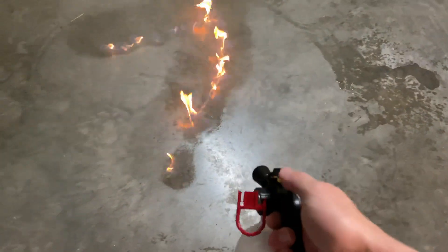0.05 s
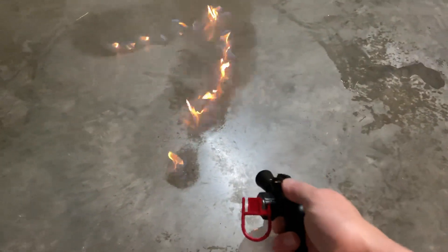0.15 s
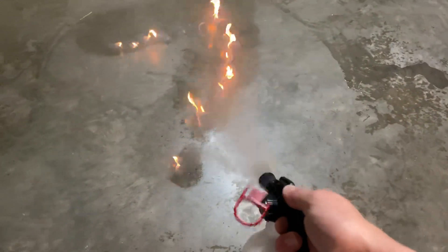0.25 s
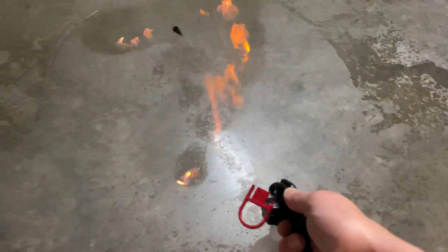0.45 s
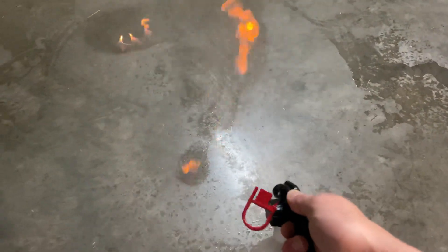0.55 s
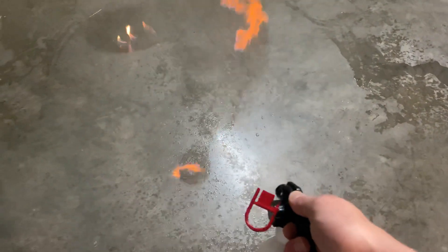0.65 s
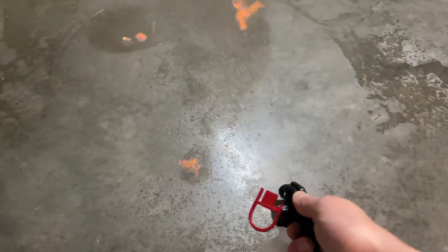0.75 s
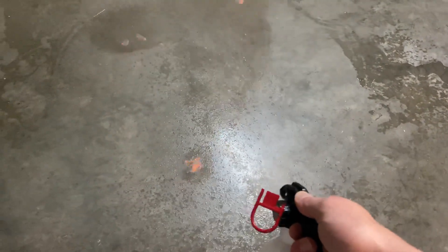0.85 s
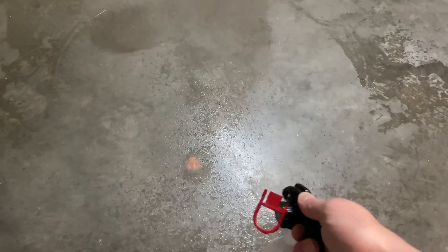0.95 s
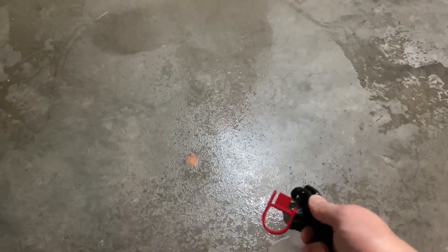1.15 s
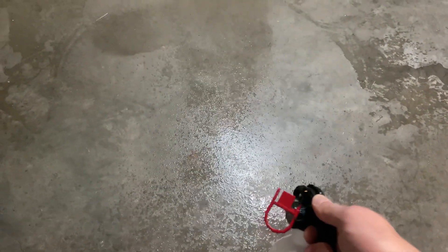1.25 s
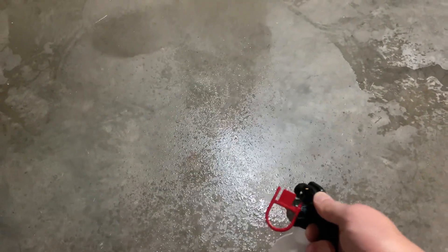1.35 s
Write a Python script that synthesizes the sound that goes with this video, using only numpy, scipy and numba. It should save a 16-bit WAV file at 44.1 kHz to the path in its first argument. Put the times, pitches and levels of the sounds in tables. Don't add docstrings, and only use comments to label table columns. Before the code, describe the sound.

A handheld water extinguisher spray: near silence, a thin leak, then a sharp bursting hiss close to the microphone, quickly sagging to duller wet sputter, with a dull knock midway, in an echoing concrete room.

```python
import sys
import numpy as np
from scipy import signal
from scipy.fft import rfft, irfft
from scipy.io import wavfile
from scipy.ndimage import uniform_filter1d
from numba import njit

SR = 44100
rng = np.random.default_rng(int(sys.argv[2]) if len(sys.argv) > 2 else 0)


def ratio(d):
    e = np.asarray(d, float) / 20
    return 10 ** e


def master(y):
    cut = np.clip(np.atleast_2d(y).T, -1, 1)
    pcm = np.round(cut * 32767)
    wavfile.write(sys.argv[1], SR, pcm.astype(np.int16))


N = 61739
T = np.arange(N) / SR
OPEN_S = 0.246
FLICKER_DB = 1.2


def level(x, rms_db):
    return x * ratio(rms_db) / np.sqrt(np.mean(x ** 2))


def noise():
    return rng.standard_normal(N)


def colour(x, points):
    points_hz, points_db = np.array(points, float).T
    bins_hz = np.maximum(np.arange(N // 2 + 1) * SR / N, 1)
    gain_db = np.interp(np.log(bins_hz), np.log(points_hz), points_db)
    return level(irfft(rfft(x) * ratio(gain_db), N), 0)


@njit
def svf(x, hz, width_hz):
    y = np.empty(len(x))
    band, low = 0., 0.
    for i in range(len(x)):
        g = np.tan(np.pi * hz[i] / SR)
        k = width_hz / hz[i]
        v = (band + g * (x[i] - low)) / (1 + g * (g + k))
        band = 2 * v - band
        low += 2 * g * v
        y[i] = k * v
    return y


def walk(rate_hz):
    hold = int(SR / rate_hz)
    steps = np.clip(rng.standard_normal(N // 8)[:N // hold + 1], -1.7, 1.7)
    slewed = uniform_filter1d(np.repeat(steps, hold), hold)
    return 1.3 * uniform_filter1d(slewed, hold)[:N]


def rings(table, drift):
    out = 0
    for hz, width_hz, level_db in table:
        centre_hz = hz * (1 + drift * walk(13.2))
        flicker = ratio(level_db + FLICKER_DB * walk(24.2))
        once = svf(noise(), centre_hz, float(width_hz))
        out = out + flicker * level(svf(once, centre_hz, float(width_hz)), 0)
    return out


def decay(start_s, t60_s):
    return np.exp(-np.log(1000) * np.maximum(T - start_s, 0) / t60_s)


def fade(start_s, t60_s):
    return (T >= start_s) * decay(start_s, t60_s)


def rise(start_s, length_s):
    return np.clip((T - start_s) / length_s, 0, 1)


def pings(table):
    out = 0
    for centre_s, level_db, pitch_hz, half_ms in table:
        t = T - centre_s
        out = out + ratio(level_db) * np.exp(-(t * 1000 / half_ms) ** 2) * np.sin(2 * np.pi * pitch_hz * t)
    return out


# hz [Hz], level_db [dB per Hz]
ROOM_TONE = [(30, -12), (60, 3.5), (130, -13.5), (250, -7.5), (500, -10), (1900, -22.5), (4000, -29),
             (16000, -44)]
# time_s [s], level_db [dB]
AIR_GUSTS = [(0, -49), (.17, -48), (.2, -54), (.5, -52), (.62, -47), (.95, -50), (1.1, -40), (1.22, -46),
             (1.3, -41), (1.4, -48)]
# start_s [s], level_db [dB], length_s [s]
AIR_SHOVES = [
    (0.2474, -25, 0.0099),
    (.278, -38, 0.024),
]


def air():
    gust_s, gust_db = np.array(AIR_GUSTS).T
    slow = colour(noise(), [(1, -37), (5, 1), (15, -1), (35, -12), (70, -31), (200, -59)])
    slow = slow * ratio(np.interp(T, gust_s, gust_db))
    push = colour(noise(), [(20, -6), (70, -4), (300, -4), (900, -14)])
    push = ratio(-29.5) * fade(OPEN_S - .002, 0.11) * push
    shove = 0
    for start_s, level_db, length_s in AIR_SHOVES:
        swing = np.cos(np.pi * (T - start_s) / length_s)
        shove = shove + ratio(level_db) * rise(start_s, 0.0011) * fade(start_s, 4 * length_s) * swing
    room_db = -62 + 10 * (T > OPEN_S)
    return ratio(room_db) * colour(noise(), ROOM_TONE) + slow + push + shove


# hz [Hz], width_hz [Hz], level_db [dB]
VALVE_GAP = [(4300, 900, -3), (5000, 900, -2), (7700, 1300, -10), (10300, 2500, -13), (14500, 3000, -21),
             (1900, 1500, -20), (9000, 8000, -14)]


def leak():
    swell = rise(.199, .013) ** 2 * (T < OPEN_S)
    return ratio(-39) * swell * rings(VALVE_GAP, 0.011)


# centre_s [s], level_db [dB], pitch_hz [Hz],
# half_ms [ms]
SINGLE_PINGS = [(.2468, -5, 5600, .6), (.2481, -9, 7900, .7), (.249, -24, 300, 2.5), (.289, -17, 1950, 2.5),
                (.5138, -16, 10800, .1), (.5146, -22, 9800, .8), (.509, -23, 10500, .4),
                (1.127, -25, 4200, 1.), (1.140, -26, 4600, 1.8), (1.138, -32, 2000, 1.4),
                (1.356, -31, 1750, .9), (1.021, -39, 420, 2.5), (.203, -56, 1000, 4)]


def single_pings():
    return pings(SINGLE_PINGS)


# time_s [s], level_db [dB], throat_hz [Hz], mist_db [dB]
NOZZLE_FLOW = [(0.2431, -40, 5470, -18), (0.2462, -13.5, 5300, -8), (0.253, -11.5, 5300, 2.5),
               (0.272, -7, 5430, -7), (0.329, -13.5, 4970, -14), (.4, -19.5, 4900, -14),
               (.49, -25, 5130, -31), (.54, -24, 4970, -2.5), (0.702, -26, 4700, -30),
               (.92, -27, 4700, -23), (1.14, -31, 4350, -13), (1.25, -35, 4000, -6.5),
               (1.4, -40.5, 4600, -4)]
# hz [Hz], level_db [dB per Hz]
GAS_JET = [(35, -56), (60, -29.5), (398, -16.5), (1440, -20), (1950, -28), (2710, -19), (5460, -13),
           (12100, -11), (16000, -22)]
# hz [Hz], width_hz [Hz], level_db [dB]
GAS_WHISTLES = [(6066, 31, -6), (8560, 100, -12), (5430, 500, -6), (4120, 210, -5.5), (8030, 520, -12)]
# hz [Hz], level_db [dB per Hz]
WATER_SPRAY = [(35, -46), (60, -19.5), (346, -5.5), (389, -3.5), (666, -8), (2000, -4), (4860, -2.5),
               (11500, -14), (16000, -23)]
# hz [Hz], width_hz [Hz], level_db [dB]
NOZZLE_PIPES = [(2030, 420, -6), (2350, 700, -10), (3400, 900, -8), (520, 600, -19), (6300, 1200, -10)]
# hz [Hz], level_db [dB per Hz]
MIST_HISS = [(5000, -39), (8000, -3), (10000, 9.5), (12500, 2.5), (14500, -13), (16000, -14)]


def nozzle():
    time_s, level_db, throat_hz, mist_db = np.array(NOZZLE_FLOW).T
    gas = decay(OPEN_S + 0.051, 1)

    hz = np.interp(T, time_s, throat_hz) * (1 + 0.039 * walk(30.3))
    throat = svf(svf(noise(), hz, 2960.0), hz, 2940.0)
    throat = level(throat, 5.5) * ratio(0.5 * walk(260))
    throat = throat * (0.79 + 0.21 * gas)

    roar = gas * (colour(noise(), GAS_JET) + rings(GAS_WHISTLES, 0.0048))
    spray = np.sqrt(1 - gas ** 2) * colour(noise(), WATER_SPRAY) * ratio(1.8 * walk(150))

    drops_per_s, scatter_db = 900, 4
    landed = rng.random(N) < drops_per_s / SR
    sizes = ratio(scatter_db * np.minimum(rng.exponential(size=N), 3.5))
    hits = landed * sizes * np.sign(noise())
    drops = ratio(-2) * (1 - gas) * colour(hits, WATER_SPRAY)

    pipes = (1 - 0.59 * gas) * rings(NOZZLE_PIPES, 0.0067)
    mist = ratio(np.interp(T, time_s, mist_db) + walk(90)) * colour(noise(), MIST_HISS)
    mix = throat + roar + spray + drops + pipes + mist
    flow_db = np.interp(T, time_s, level_db) + 0.67 * walk(18.7)
    return level(mix, 0) * ratio(flow_db) * (T > time_s[0])


# hz [Hz], level_db [dB per Hz]
KNOCK_BOOM = [(120, -29), (190, 5), (350, -0.5), (550, -1), (800, -3.5), (1200, -2.5), (2200, -14),
              (5000, -43)]
# centre_s [s], level_db [dB], pitch_hz [Hz], half_ms [ms]
LOOSE_PARTS = [
    (.7265, -23, 2900, 1),
    (.731, -19, 1150, 2),
    (.7295, -16, 4200, 1.2),
    (.7345, -13, 4300, 1.2),
    (.741, -17, 3200, 1.6),
    (.7405, -19, 2000, 1.2),
    (.747, -23, 520, 2.5),
    (.758, -22, 340, 3.5),
    (.773, -26, 300, 4),
    (.734, -24, 260, 5),
]


def knock():
    start_s, blow_hz = .7228, 480
    cycle = (T - start_s) * blow_hz
    blow = -ratio(-15) * np.sin(2 * np.pi * cycle) * (cycle > 0) * (cycle < 1)
    blow = signal.sosfilt(signal.butter(2, 140, "high", fs=SR, output="sos"), blow)
    slap_s = .725
    slap = rings([(3200, 2400, -22.5), (1150, 600, -36)], 0.026)
    slap = rise(slap_s, .006) * fade(slap_s, .6) * slap
    boom = ratio(-28 + FLICKER_DB * walk(140)) * colour(noise(), KNOCK_BOOM)
    boom = rise(start_s, .005) * decay(start_s + .055, .45) * boom
    return blow + boom + slap + pings(LOOSE_PARTS)


def concrete_room(near):
    tail = fade(.012, 1) * colour(noise(), [(100, -7), (3000, -4.5), (9000, -4), (16000, -13)])
    return signal.fftconvolve(near, tail / np.sqrt(np.sum(tail ** 2)))[:N]


def scene():
    near = nozzle() + leak() + single_pings()
    return (near + ratio(-8) * concrete_room(near) + knock() + air())[None]


def band_limit(x):
    return signal.sosfilt(signal.butter(12, 16340, fs=SR, output="sos"), x)


def record(dry):
    clipped = np.clip(dry, -.86, .86)
    top_cut = signal.ellip(10, .2, 70, 15900, fs=SR, output="sos")
    return band_limit(signal.sosfilt(top_cut, clipped))


dry = scene()
out = record(dry)
master(out)
```